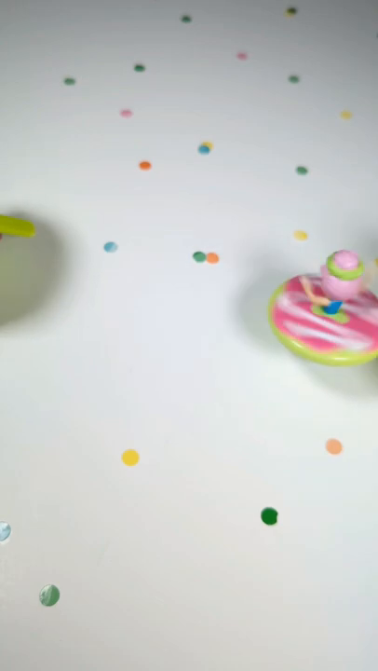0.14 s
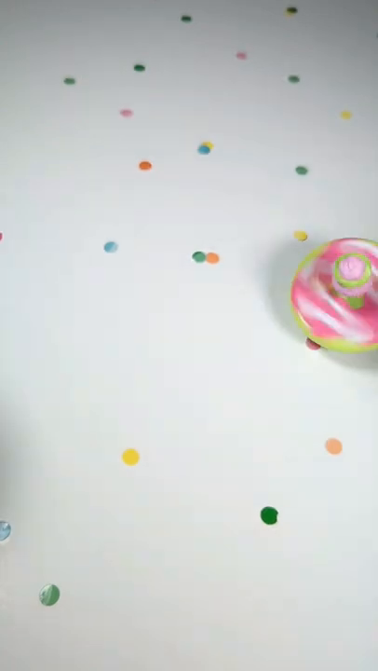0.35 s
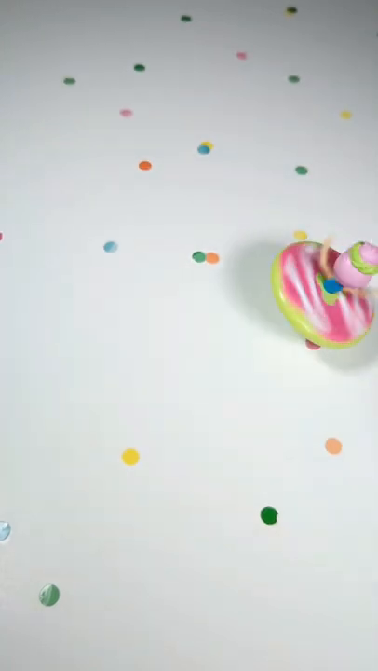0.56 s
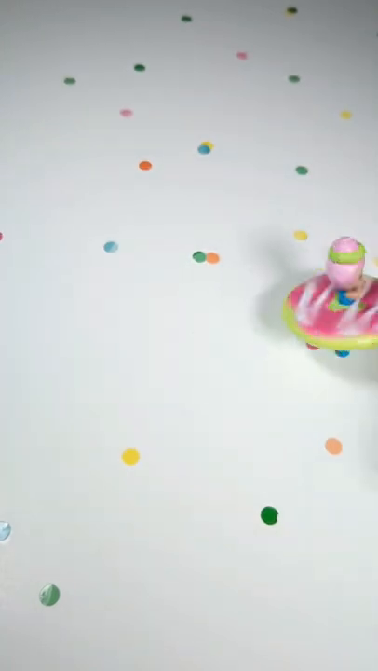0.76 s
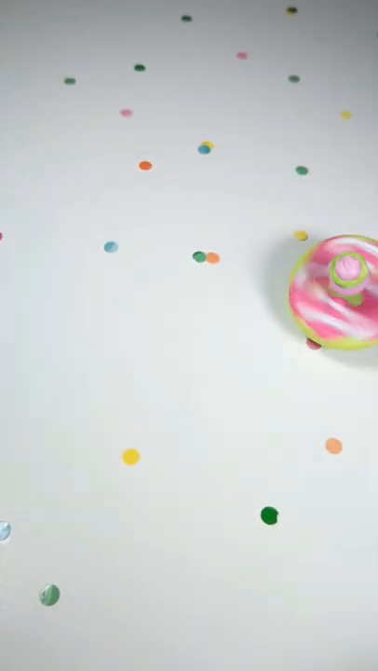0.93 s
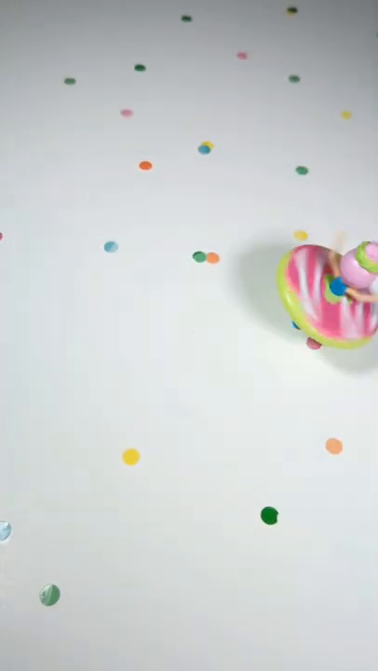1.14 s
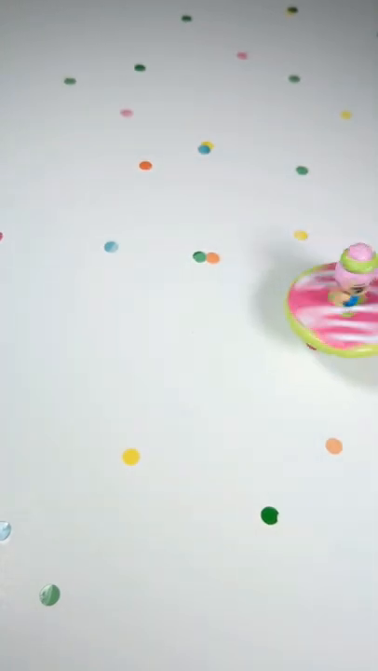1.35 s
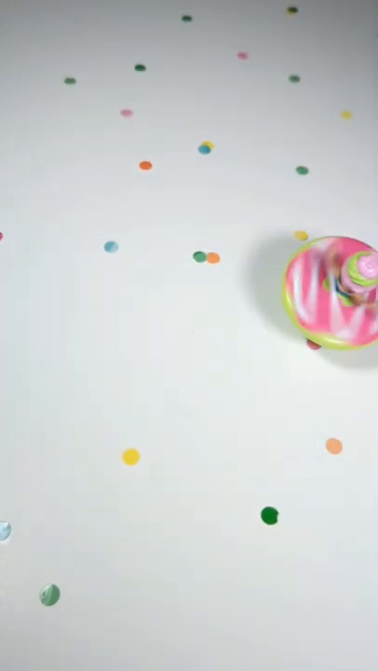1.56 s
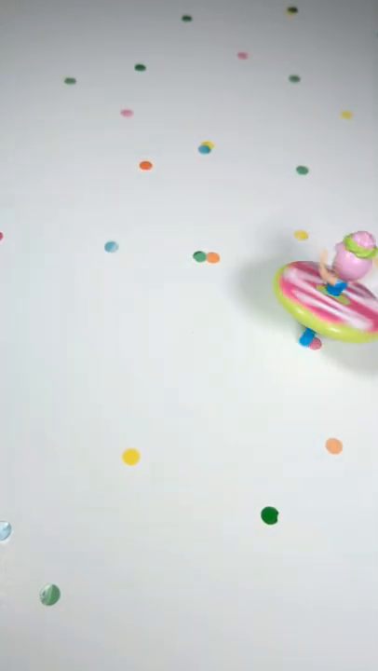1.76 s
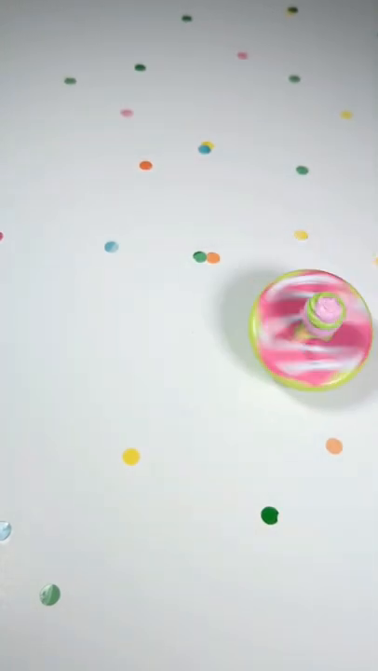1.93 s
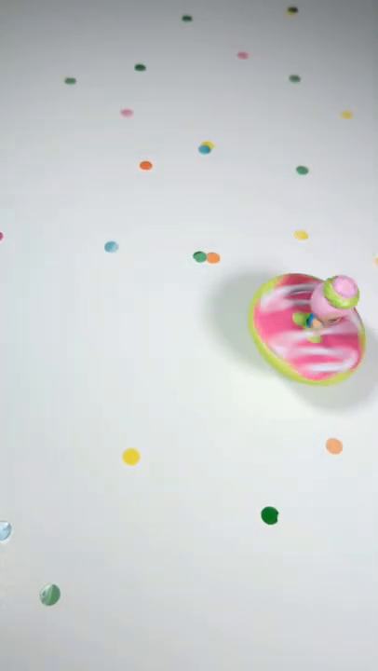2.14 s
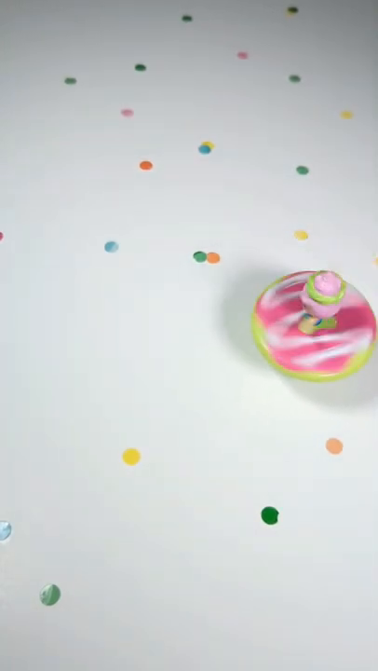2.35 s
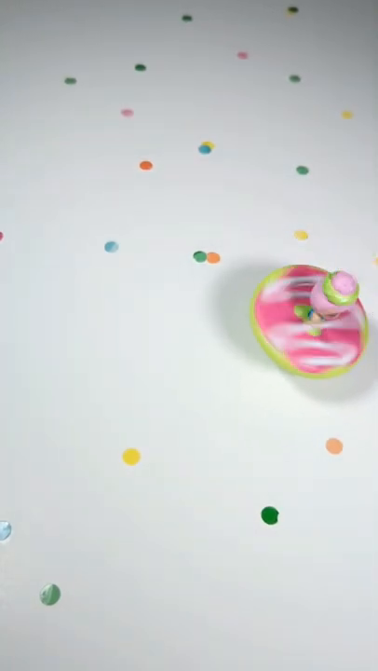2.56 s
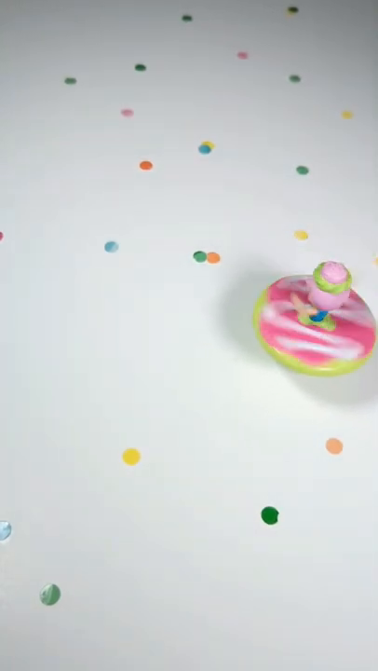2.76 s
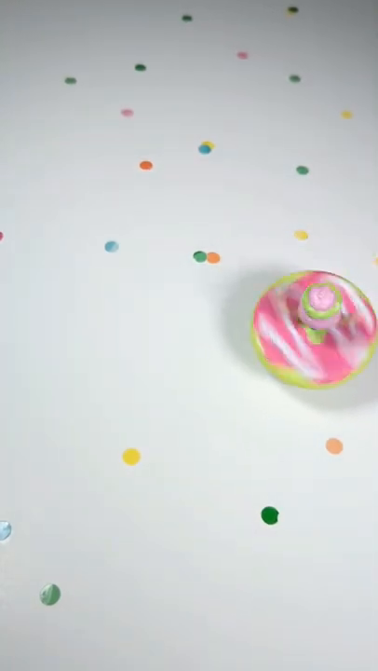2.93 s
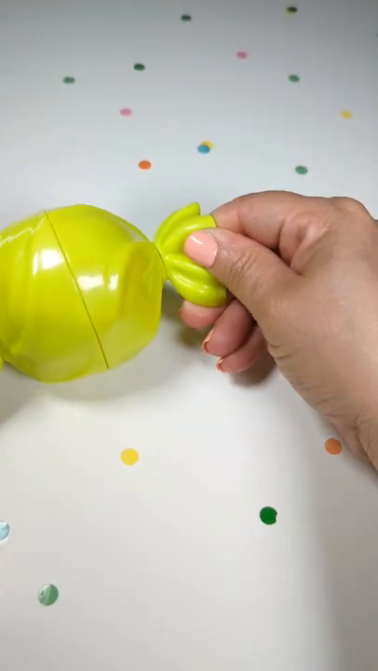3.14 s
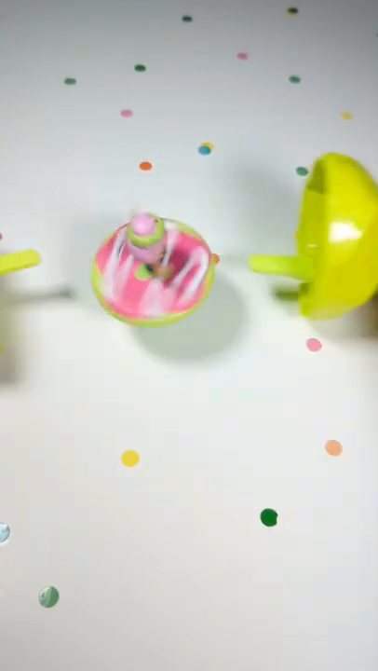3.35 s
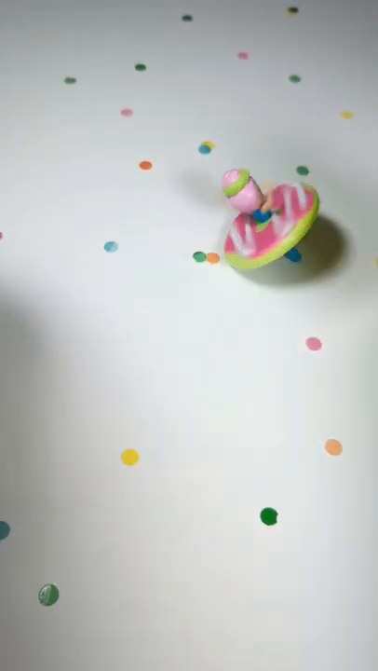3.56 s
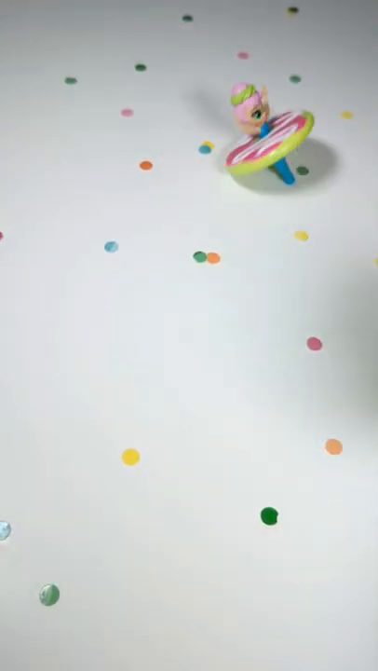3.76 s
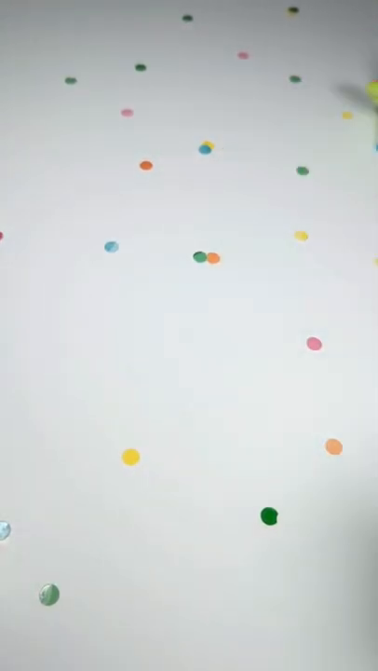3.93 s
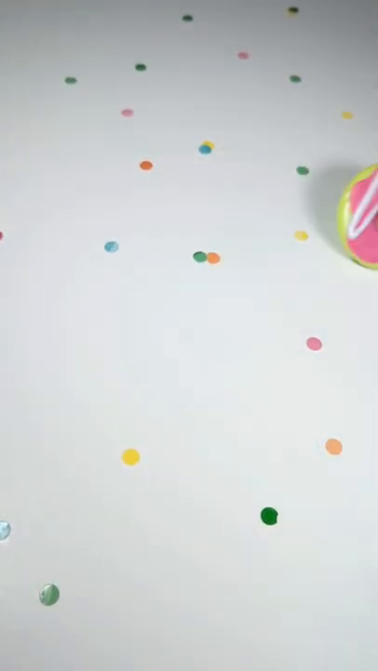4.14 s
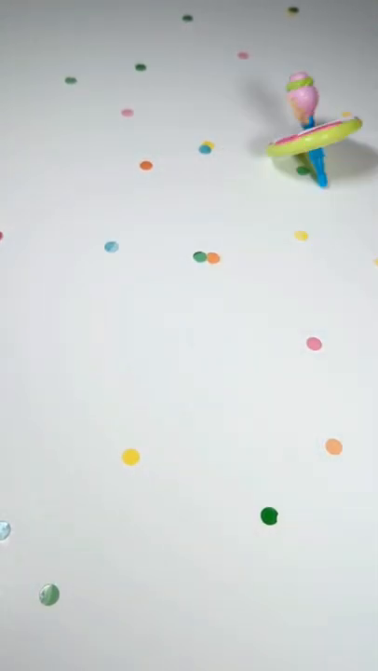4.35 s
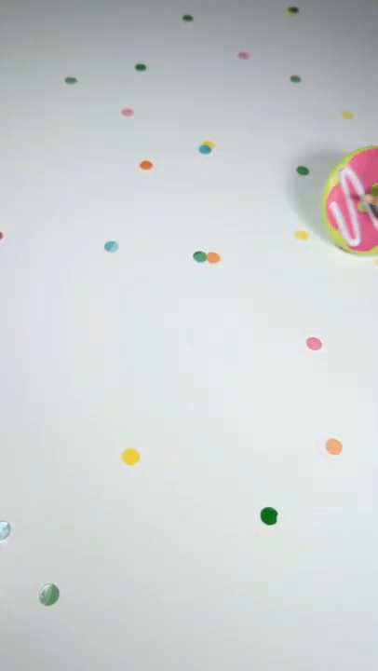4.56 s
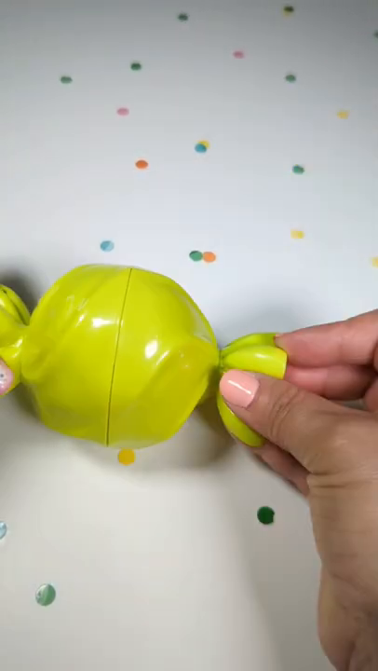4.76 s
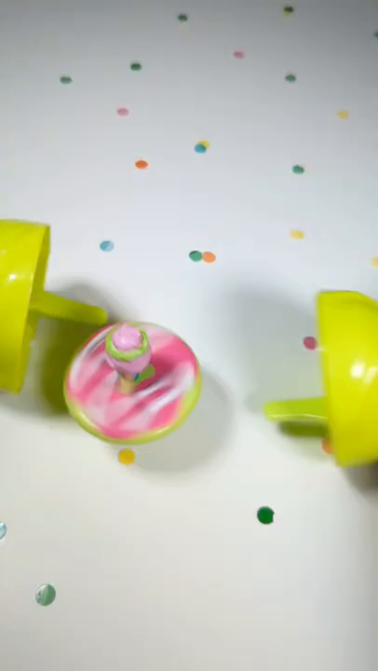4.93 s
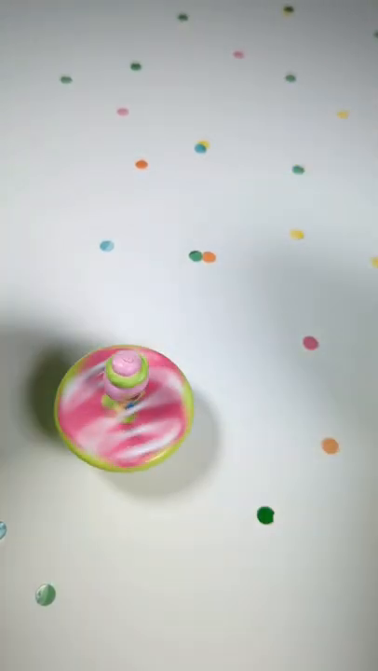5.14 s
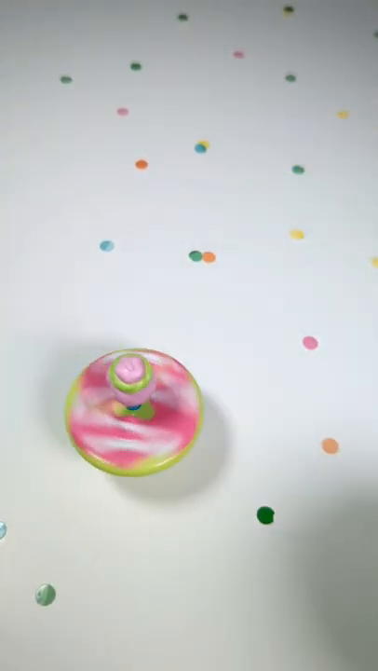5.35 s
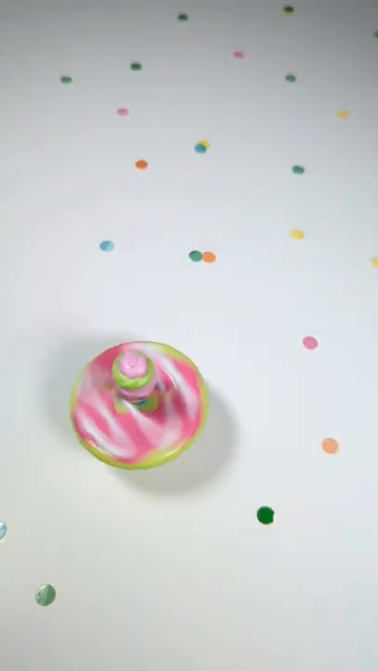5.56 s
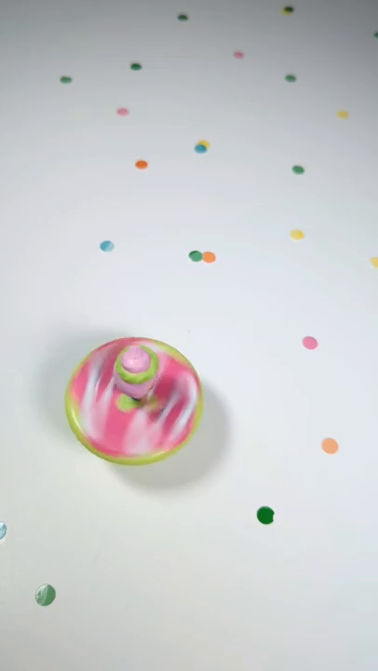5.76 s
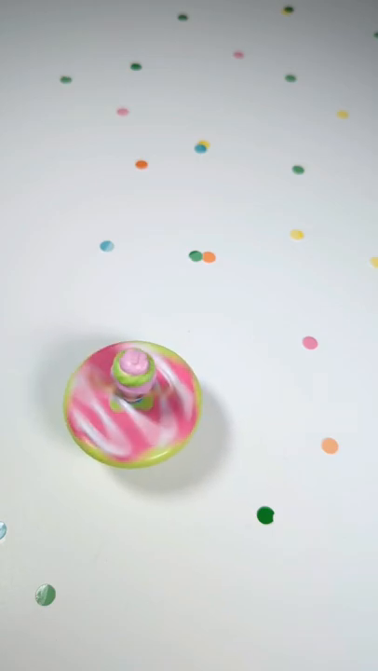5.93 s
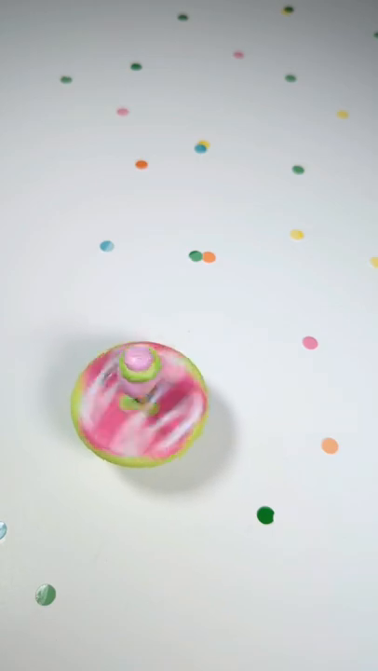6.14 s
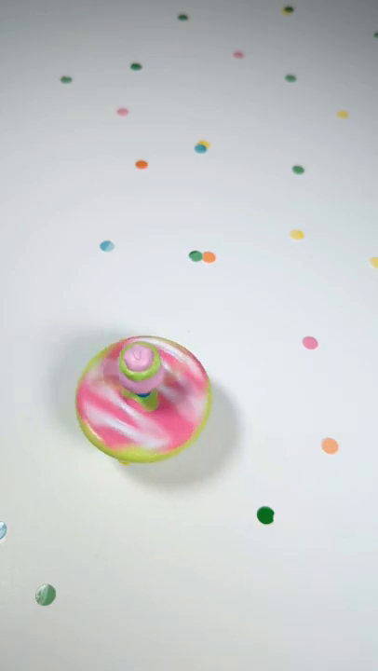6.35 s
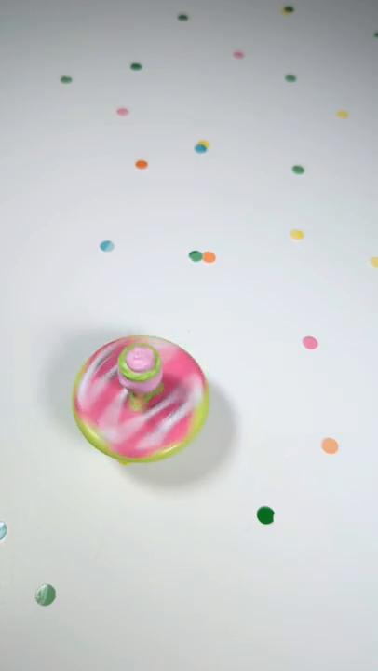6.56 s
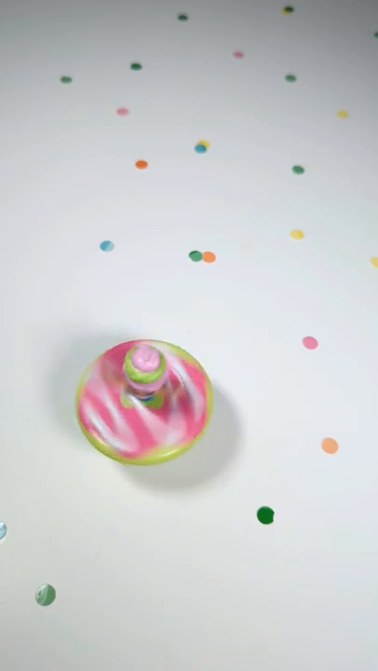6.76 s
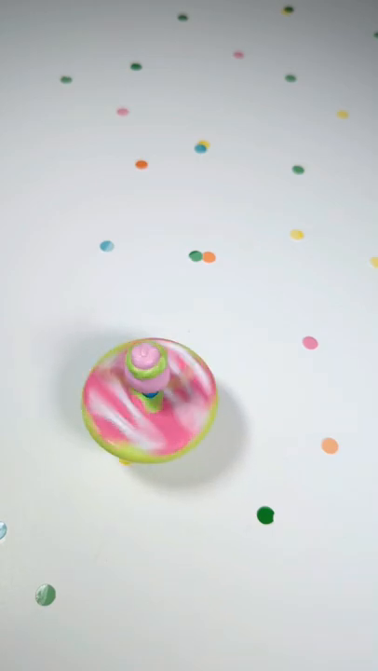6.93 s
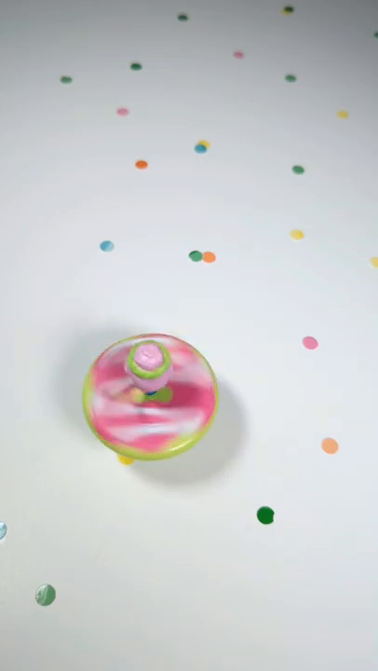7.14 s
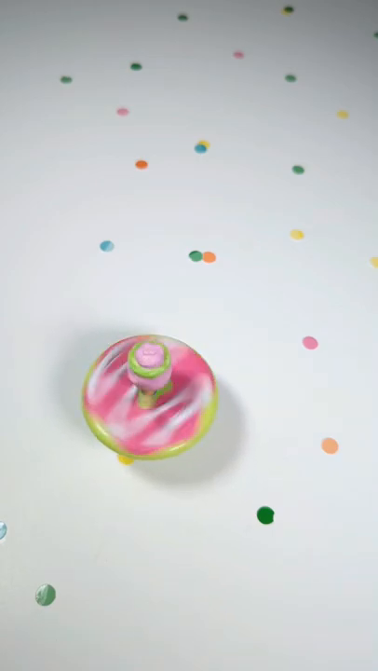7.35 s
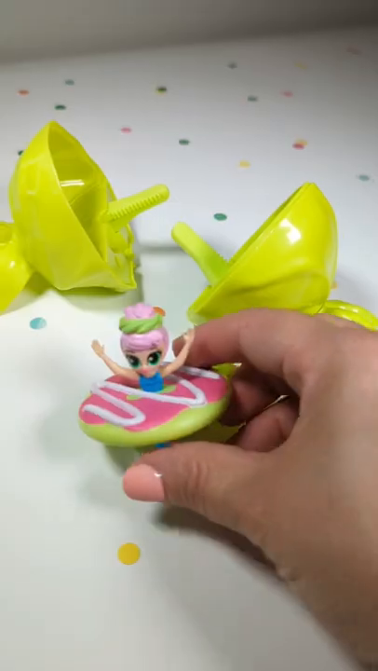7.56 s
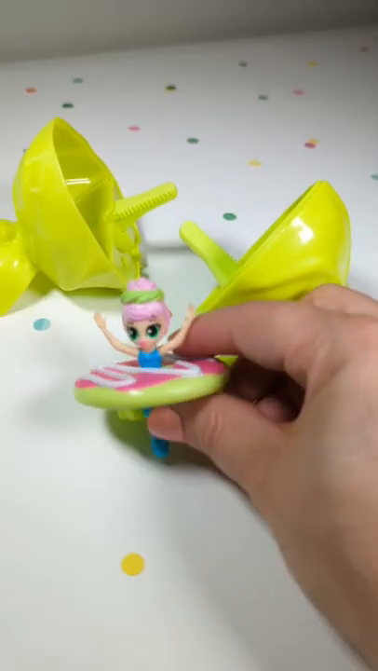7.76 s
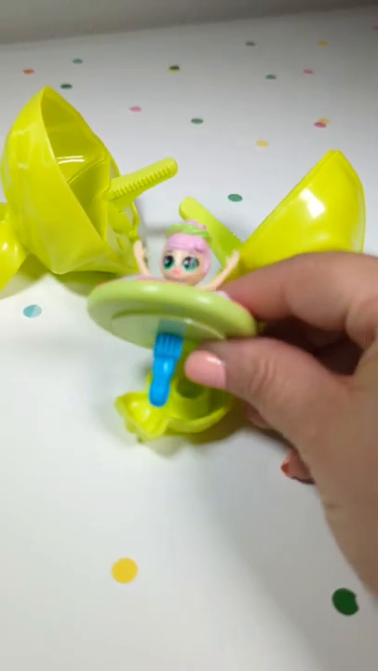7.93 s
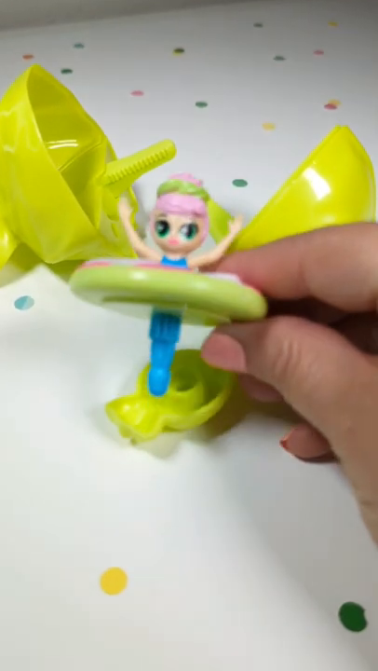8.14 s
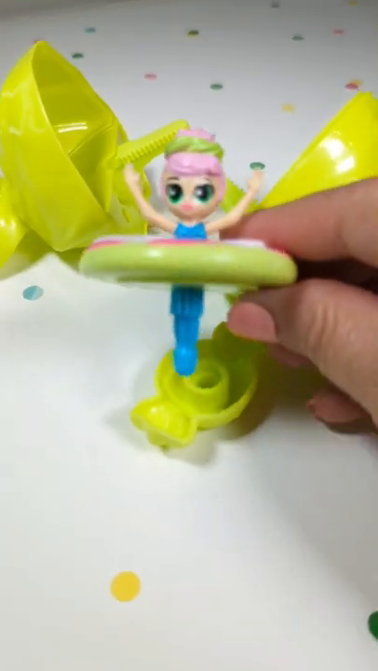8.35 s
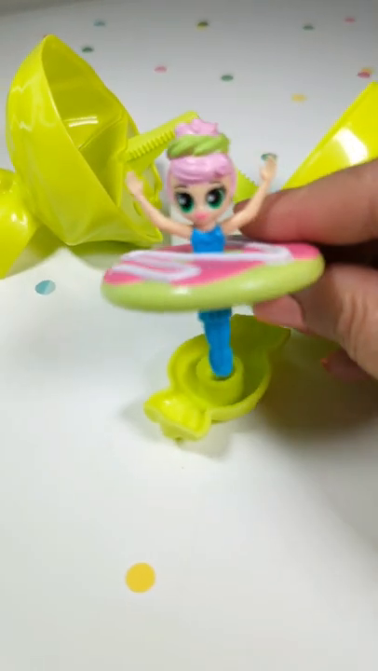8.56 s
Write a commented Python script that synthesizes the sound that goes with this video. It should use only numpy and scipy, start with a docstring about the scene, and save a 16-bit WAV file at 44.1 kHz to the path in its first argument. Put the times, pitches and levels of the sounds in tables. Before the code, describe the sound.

Close perspective on a hard, resonant table in a small room with faint low air noise. At 0.13 s a very short rising gear rasp ends in bright plastic snaps; the top lands at 0.2 s with a rapid run of knocks and rattle until about 0.36. A low, wavering hum near 250 Hz with faint scratching continues, swelling gently around 1.4 and 2 s, fading by 3 s. A quiet gap with slight rubbing follows. At 3.42 s a second zip and snap bring loud, irregular thuds to 3.9, then deep skittering rumble, tiny ticks, a brief faint squeak at 4.05 and bumps at 4.35 and 4.82. It cuts off at 4.89. At 5.06 s the third rasp and snaps lead to the hardest slam at 5.13, dying after 5.3 into near silence. From 7.68 to 8.55 come soft handling knocks, the clearest at 8.05, and small plastic clicks, then a faint rub.

```python
"""A plastic spinning top is launched three times, bounces on a hard table and rumbles over it on its tip.
Each launch from the hollow shell is gear teeth: random tiny impacts that ring the shell and shake the table.
Bounces and rumble are blows that ring the table's modes; sliding, ticks and squeaks come from plastic parts.
At the end a hand knocks the toy about and puts its parts down. A small room adds echoes and faint air noise."""
import sys
import numpy as np
from scipy import signal
from scipy.io import wavfile
from scipy.ndimage import uniform_filter1d

SR = 44100
rng = np.random.default_rng(int(sys.argv[2]) if len(sys.argv) > 2 else 0)


def log_audio(samples):
    """Write samples as a 16-bit WAV file to the path given in sys.argv[1]."""
    # one column per channel
    frames = np.atleast_2d(samples).T
    # limit to full scale, then quantise
    limited = np.clip(frames, -1, 1)
    pcm = np.round(limited * 32767).astype(np.int16)
    wavfile.write(sys.argv[1], SR, pcm)


N = 383669

# The launcher's shell snaps and clacks. Each row: time in seconds, level in dB.
SNAP_EVENTS = [(0.1484, -15), (0.168, -19.5), (0.206, -5.5), (0.207, -8.5), (1.2302, -28.5), (1.2352, -38),
               (1.486, -35.5), (3.497, -6.5), (5.078, -18.5), (5.089, -12), (5.1267, -9.5), (5.128, -13),
               (8.055, -28)]
# The gear speeds up, lets the top go and whirrs on, if its stop comes after the release.
# Each row: start, full speed, release and stop in seconds, rasp, shell drone, table shake and whirr in dB,
# whine at the release in Hz, whine in dB.
LAUNCH_EVENTS = [(0.128, 0.184, 0.19, 0.45, -25.5, -24, -15.5, -61.5, 2040, -23.5),
                 (3.419, 3.466, 3.478, 4.3, -28, -26.5, -18.5, -59, 1750, -29),
                 (5.056, 5.087, 5.094, 4.1, -20.5, -32, -31, -67, 1488, -28.5)]
# Plastic parts slide over each other. Each row: middle in seconds, length in seconds,
# hiss, shell scrape and table rumble in dB.
SLIDE_EVENTS = [(1.363, 0.077, -72, -56, -62), (1.451, 0.082, -54, -52.5, -48),
                (1.591, 0.15, -63, -69, -52), (3.131, 0.078, -70.5, -66, -69),
                (3.188, 0.058, -54.5, -82, -62), (3.243, 0.066, -64, -81.5, -67),
                (8.65, 0.2, -67.5, -75.5, -57)]
# Ways the table rings. Each row: pitch in Hz, level in dB, seconds to fade by 60 dB before extra damping.
TABLE_MODES = [(120, -24, .3), (171, -7, .26), (193, -15, .2), (251, 4, .22), (320, -4, .14),
               (350, -6, .12), (463, 1, .16), (497, -5, .13), (556, -10, .11), (619, 5, .14),
               (660, -6, .11), (739, -6, .15), (790, -9, .12), (852, -9, .15), (897, -10, .12),
               (982, -6, .12), (1080, -9, .11), (1190, -12, .1), (1330, -10, .12)]
# Colour of a thud on the table. Each row: frequency in Hz, level in dB.
THUD_COLOUR = [(30, -38), (70, -15.5), (160, -6.5), (400, 5), (950, -3.5), (1400, -11.5), (2400, -18),
               (3600, -34), (6000, -48), (15000, -60.5)]
# Colour of hard plastic contact. Each row: frequency in Hz, level in dB.
PLASTIC_COLOUR = [(200, -18), (1200, 1.5), (2400, 3.5), (3500, 0), (4500, -0.5), (6800, -0.5), (8000, -4.5),
                  (9500, -0.5), (12000, -1), (15500, -5.5)]
# Clear ringing of the hollow shell. Each row: pitch in Hz, level in dB, seconds to fade by 60 dB.
SHELL_MODES = [(1400, -5.5, 0.046), (1756, 1, .08), (1910, -1.5, 0.077), (2043, -4.5, 0.056),
               (2330, -7.5, .06), (4190, -4.5, 0.04), (6360, -10, 0.045)]
# Colour of dry friction on the table. Each row: frequency in Hz, level in dB.
SCRATCH_COLOUR = [(100, 8), (600, 5.5), (1300, 0), (2100, 3.5), (2900, -1), (4000, -8), (6800, -16),
                  (8200, -31), (15000, -16)]
# Colour of plastic sliding on plastic. Each row: frequency in Hz, level in dB.
SLIDE_COLOUR = [(500, -23.5), (2000, 0), (4000, -0.5), (6500, 0.5), (8200, -3.5), (10000, 2.5),
                (12500, -1.5), (15500, -7.5)]
# Colour of the air noise. Each row: frequency in Hz, level in dB.
AIR_COLOUR = [(15, -34.5), (25, -5), (48, -1.5), (69, -19.5), (118, -2.5), (181, -14.5), (213, -23),
              (250, -6.5), (363, -27.5), (655, -23), (903, -28), (5570, -35.5), (15000, -38.5)]
# How the room echoes die. Each row: frequency in Hz, seconds to fade by 60 dB.
ROOM_FADE = [(100, .26), (300, .17), (800, .17), (2000, .26), (5000, .25), (14000, .25)]
# Moments when the sound of the table blows breaks off. Each entry: time in seconds.
BREAK_TIMES = [3.077, 4.886]
# The tip sticks and squeals. Each row: start in seconds, length in seconds, middle pitch in Hz, level in dB.
SQUEAK_EVENTS = [(4.05, 0.043, 2190, -47.5), (4.595, 0.074, 5600, -70)]
# Ringing of the toy's plastic parts. Each row: pitch in Hz, level in dB, seconds to fade by 60 dB.
TOY_MODES = [(1430, -3, 0.092), (1810, -8, 0.041), (2400, -0.5, .07), (2530, 0, 0.086)]
# Push of an upright spinning tip on the table. Each row: frequency in Hz, level in dB.
UPRIGHT_FORCE = [(25, -9), (80, 3.5), (130, 3), (185, 11), (218, 2), (250, 0.5), (295, -6.5), (470, -17.5),
                 (630, -22.5), (1000, -26.5), (3000, -47.5)]
# Push of a tilted, skittering tip on the table. Each row: frequency in Hz, level in dB.
TILTED_FORCE = [(25, 29), (80, -11), (145, 13.5), (200, 9.5), (260, -4.5), (380, -1.5), (500, -17),
                (700, -17), (3000, -34.5)]
# The top bounces. Each row: time in seconds, level in dB, hardness in dB, plastic tick in dB against the level.
BOUNCE_EVENTS = [(0.203, -6.5, -2, -4), (0.247, -9.5, -1, -21), (0.2615, -8.5, -7.5, -30),
                 (0.294, -8.5, -10.5, -23), (0.314, -13, -10, -33), (0.333, -13.5, -18, -31),
                 (0.352, -12, -22.5, -41), (1.925, -34.5, -32, -31), (3.068, -31, -15.5, -20),
                 (3.475, -12, 2.5, -3), (3.4995, -6.5, 10, -8), (3.558, -7.5, -1, -35),
                 (3.5755, -9.5, 4, -35), (3.6065, -5, -4, -22.5), (3.63, -13.5, -13, -28),
                 (3.728, -13, -0.5, -20.5), (3.7815, -22, -5, -27), (3.8035, -18.5, -6, -23),
                 (3.8585, -13, -3.5, -24), (4.3465, -10, -6.5, -26.5), (4.695, -26.5, -8, -43),
                 (4.8175, -15.5, -10, -16.5), (4.834, -14.5, -16.5, -24.5), (5.126, -1.5, 13.5, -33),
                 (5.154, -7, -1.5, -22), (5.1735, -11.5, -4, -35), (5.217, -5.5, -2.5, -19),
                 (5.263, -12.5, -8.5, -26)]
# A hand puts the toy's parts down. Each row: time in seconds, level in dB, hardness in dB,
# plastic tick in dB against the level.
KNOCK_EVENTS = [(7.678, -25.5, -5, -43), (7.831, -39, -4, -30), (7.8415, -33, -10.5, -30),
                (7.989, -28, -8.5, -31), (8.0545, -18, -4, -4), (8.352, -52, -12, -24.5)]
# Light ticks of the top's own parts. Each row: time in seconds, level in dB, share of ringing in dB.
TICK_EVENTS = [(4.04, -45, -11), (4.106, -44.5, 3), (4.166, -55.5, -10), (5.404, -45.5, 5.5),
               (8.281, -48, -12), (8.345, -39.5, -3), (8.5415, -38, -10.5)]
# Each spin runs hard at first, then calms down. Each row: start, start of calming, end of calming and end
# in seconds, rumble in dB, scratch in dB, dB lost in calming, tilt from 0 to 1.
SPIN_EVENTS = [(0.3, 1.295, 2.7, 3.08, -49, -67, 16, 0), (3.56, 3.7, 3.8, 4.886, -25.5, -56.5, 15, 0.83),
               (5.302, 5.749, 6.2, 7.62, -71, -70, 14.5, 0.15)]
# The top leans over and its tip bears on the table. Each row: middle in seconds, length in seconds, level in dB.
SWERVE_EVENTS = [(0.872, 0.15, -42.5), (1.402, 0.12, -35.5), (1.653, 0.23, -54.5), (1.944, 0.092, -34.5),
                 (2.022, 0.19, -35.5), (2.429, .18, -52), (2.785, 0.061, -60), (3.064, .06, -34.5),
                 (3.89, 0.36, -30), (4.047, 0.033, -33), (4.164, 0.12, -35), (4.359, 0.12, -29.5),
                 (4.687, 0.2, -37)]
# The top chatters between its first bounces. Each row: start and end in seconds, table and plastic in dB.
LANDING_EVENTS = [(0.205, 0.357, -26.5, -39), (3.51, 3.94, -28, -34.5), (5.128, 5.295, -21.5, -31.5)]
# Stretches of steady low rumble and faint scratchy noise. Each row: start and end in seconds,
# rumble and scratch in dB.
BACKGROUND_STRETCHES = [(3.128, 3.28, -60, -73), (4.902, 5.05, -70, -76.5), (7.636, 8.702, -64, -64)]
# Many short shell modes blur into one band. Each row: frequency in Hz, level in dB.
HOLLOW_COLOUR = [(300, -22.5), (900, -5.5), (1400, -0.5), (2000, 1), (2700, -1.5), (3300, -16),
                 (4200, -18.5), (8000, -36)]

TIME = np.arange(N) / SR  # seconds
RING = TIME[:SR // 3]  # seconds since a blow
COAST_S, WHIRR_FADE_DB_PER_S, WHINE_RISE_HZ_PER_S = .03, 26.5, 6000
CHATTER_FADE_DB_PER_S, RATTLE_FADE_DB_PER_S = 44.5, 76.5
SCRATCH_FOLLOWS = 0.68  # share of a spin's calming that the scratch follows
EDGE_HZ = 15650  # top of the final band


def amp(db):
    """Turns decibels into gain."""
    return 10 ** (np.asarray(db) / 20)


def evened(x):
    """Scales a sound to an average (rms) level of 1."""
    return x / np.sqrt(np.mean(x ** 2) + 1e-20)


def unit(x):
    """Scales a sound to energy 1."""
    return x / np.linalg.norm(x)


def steadied(x, size):
    """Evens out swells slower than a window of size samples."""
    return x / np.sqrt(abs(uniform_filter1d(x ** 2, size)) + 1e-12)


def read(points, hz):
    """Reads between the points of a table on a log-frequency axis."""
    f, value = np.transpose(points)
    return np.interp(np.log(hz + 1), np.log(f), value)


def add(mix, s, sound):
    """Mixes a sound in at time s."""
    part = mix[round(s * SR):][:len(sound)]
    part += sound[:len(part)]


def gate(start, end, edge_s=0.025):
    """1 between two times, with short ramps."""
    return np.clip(np.minimum(TIME - start, end - TIME) / edge_s + .5, 0, 1)


def swell(s, length):
    """A smooth rise and fall that peaks at time s."""
    return np.cos(np.pi * np.clip((TIME - s) / length, -.5, .5)) ** 2


def smooth_noise(count, size):
    """Slow random wandering with an average (rms) size of 1."""
    return evened(uniform_filter1d(rng.standard_normal(count), size))


def tone(pitch):
    """A sine wave that follows a changing pitch in Hz."""
    return np.sin(2 * np.pi * np.cumsum(pitch) / SR)


def convolve(x, response):
    """Lets every sample of x set off the response, and keeps the length."""
    return signal.oaconvolve(x, response)[:len(x)]


def colour(x, points, size=4096):
    """Filters x to the given spectrum, with nothing sounding before its cause."""
    log_gain = np.log(amp(read(points, abs(np.fft.fftfreq(size, 1 / SR)))))
    minimum_phase = np.exp(np.conj(signal.hilbert(log_gain)))
    return convolve(x, np.fft.ifft(minimum_phase).real[:size // 2])


def grains(per_s, spread_db):
    """Random tiny impacts of uneven size, as rough surfaces give."""
    sign, size, chance = rng.standard_normal(N), rng.exponential(1, N), rng.random(N)
    out, hit = np.zeros(N), chance < per_s / SR
    out[hit] = sign[hit] * amp(spread_db * np.minimum(size[hit], 4))
    return out


def ringing(modes, weights_db):
    """Adds up decaying modes; neighbours start in opposite directions."""
    out = np.zeros(len(RING))
    for k, (hz, db, t60) in enumerate(modes):
        decay = amp(db + weights_db[k] - 60 * RING / t60)
        out += (-1) ** k * decay * np.cos(2 * np.pi * hz * RING)
    return out


def early(x, echo_db=-5, count=7):
    """First reflections from the table top and the things on it, up to 8 ms late."""
    taps = np.zeros(SR // 125)
    taps[rng.integers(20, len(taps), count)] = rng.uniform(-1, 1, count)
    echoed = x + amp(echo_db) * convolve(x, unit(taps))
    return echoed / np.hypot(1, amp(echo_db))


def tail(t60s):
    """Dense room echoes: noise in which each band dies at its own speed."""
    hz, t, z = signal.stft(rng.standard_normal(len(RING)), SR, nperseg=256)
    fade = amp(-60 * t / read(t60s, hz)[:, None])
    return unit(signal.istft(z * fade, SR)[1][:len(RING)])


def table(spot_db=2, modes_db=2.5, dense_db=-1, dense_t60=.08):
    """One blow: the direct thud, low modes weighted by the spot that is struck, and dense short modes."""
    modes = ringing(TABLE_MODES, spot_db * rng.standard_normal(len(TABLE_MODES)))
    band = signal.butter(3, [90, 1400], "band", fs=SR, output="sos")
    modes = signal.sosfilt(band, modes)
    dense = colour(rng.standard_normal(len(RING)) * amp(-60 * RING / dense_t60), THUD_COLOUR)
    spread = np.minimum(RING / .005, 1)  # bending waves need a few milliseconds to fill the plate
    thud = unit(colour(1. * (RING == 0), THUD_COLOUR))
    return thud + amp(modes_db) * unit(spread * modes) + amp(dense_db) * unit(spread * dense)


def click(modes, ring_db, t60, modes_db, spot_db=0.5):
    """A crack, a brief dense ring and a few modes of the plastic part, with peak 1."""
    ring = unit(rng.standard_normal(len(RING)) * amp(-60 * RING / t60))
    crack = unit(colour((RING == 0) + amp(ring_db) * ring, PLASTIC_COLOUR))
    part = unit(ringing(modes, spot_db * rng.standard_normal(len(modes))))
    sound = crack + amp(modes_db) * part
    return sound / abs(sound).max()


def air_noise():
    """Faint steady air noise: random noise, mostly of low pitch."""
    return amp(-68) * evened(colour(rng.standard_normal(N), AIR_COLOUR))


def shell(force, weights_db, dense_db):
    """The hollow shell sounds under a rough contact: a few clear modes over many blurred ones."""
    clear = evened(convolve(force, ringing(SHELL_MODES, weights_db)))
    blurred = evened(early(colour(force, HOLLOW_COLOUR), echo_db=-7))
    return steadied(clear + amp(dense_db) * blurred, size=900)


def whine(hz, s, jitter=.2, size=20):
    """The rough tone of the gear teeth; it climbs as the gear speeds up and passes about hz at time s."""
    climb = hz + WHINE_RISE_HZ_PER_S * (TIME - s)
    return np.sqrt(2) * tone(climb * (1 + jitter * smooth_noise(N, size)))


def launcher():
    """Gear teeth race past each other, sounding the shell and shaking the table; the freed gear whirrs on."""
    teeth = grains(per_s=2200, spread_db=2.0)
    rasp = steadied(early(colour(teeth, PLASTIC_COLOUR), echo_db=-0.5), size=900)
    drone = shell(teeth, np.array([-1, -3, -0.5, 1, -0.5, -11.5, -12]), dense_db=2.5)
    shake = steadied(convolve(teeth, table(spot_db=2.3, dense_db=0.5)), size=900)
    whirr = evened(early(colour(grains(per_s=2200, spread_db=2.5), SLIDE_COLOUR), echo_db=-2))
    out = np.zeros(N)
    for start, full, release, stop, rasp_db, drone_db, shake_db, whirr_db, whine_hz, whine_db in LAUNCH_EVENTS:
        speed = np.interp(TIME, [start, full, release, release + COAST_S], [0, 1, 1, 0])
        out += speed ** 2 * (amp(rasp_db) * rasp + amp(drone_db) * drone + amp(shake_db) * shake)
        whining = gate(full - COAST_S, release + COAST_S) * amp(whine_db)
        out += speed * whining * whine(whine_hz, release)
        fading_db = whirr_db - WHIRR_FADE_DB_PER_S * np.maximum(TIME - release, 0)
        out += whirr * gate(release, stop) * amp(fading_db)
    return out


def snaps():
    """Sharp plastic snaps and clacks: each one cracks and rings the shell."""
    out = np.zeros(N)
    for s, db in SNAP_EVENTS:
        add(out, s, amp(db) * click(SHELL_MODES, ring_db=7.5, t60=0.025, modes_db=-8))
    return out


def blows(rows, low_db, body_db, mid_db, damping_db_per_s, body_follows=.35, mid_follows=0.94):
    """Plastic strikes the table; harder contact drives more high modes, and damping shortens them all."""
    out = np.zeros(N)
    for s, db, hard_db, tick_db in rows:
        knock = table(spot_db=1.7, modes_db=2.5, dense_db=-3.5, dense_t60=.08)
        knock = knock * amp(-damping_db_per_s * RING)
        body, mid = body_db + body_follows * hard_db, mid_db + mid_follows * hard_db
        knock = colour(knock, [(150, low_db), (280, 0), (560, body), (900, mid), (1900, hard_db)])
        add(out, s - .0005, -amp(db) * knock / abs(knock).max())
        add(out, s, amp(db + tick_db) * click(TOY_MODES, ring_db=7, t60=0.027, modes_db=-11.5))
    return out


def chatter(stop_s=0.056):
    """Many small hops of the landing top rattle the table and the top itself, and die away."""
    hops = grains(per_s=400, spread_db=3.0)
    pushes = colour(hops, [(250, -2.5), (560, 5), (900, 0.5), (1900, -4)])
    boom = steadied(convolve(pushes, table(spot_db=1.8)), size=2000)
    rattle = shell(hops, np.array([1, -2.5, -1, 0.5, 0.5, -12.5, -17]), dense_db=6.5)
    out = np.zeros(N)
    for start, end, table_db, plastic_db in LANDING_EVENTS:
        age = np.maximum(TIME - start, 0)
        sound = amp(table_db - CHATTER_FADE_DB_PER_S * age) * boom
        sound += amp(plastic_db - RATTLE_FADE_DB_PER_S * age) * rattle
        out += sound * np.interp(TIME, [start, end, end + stop_s], [1, 1, 0], left=0)
    return out


def rumble(force):
    """Tiny bumps with the given push keep the table's low modes humming."""
    bumps = colour(grains(per_s=1000, spread_db=1.0), force)
    return steadied(convolve(bumps, table(spot_db=-2.75, modes_db=5.0, dense_db=-9.0)), size=3000)


def scratch():
    """Fine dry scratching, as of friction on the table top: dense tiny impacts."""
    return evened(colour(grains(per_s=6500, spread_db=-2.0), SCRATCH_COLOUR))


def hum(hz=251, waver_hz=8, flutter=.5, size=3000):
    """A strong low mode of the table sings as one wavering, fluttering line."""
    pitch, strength = smooth_noise(N, size), smooth_noise(N, size)
    return evened((1 + flutter * strength) * tone(hz + waver_hz * pitch))


def rolling(hum_db=-7, hum_follows=.9, swerve_scratch_db=-27):
    """The table hums under the moving top while the contact scratches; both swell when it swerves."""
    upright, tilted, grit, line = rumble(UPRIGHT_FORCE), rumble(TILTED_FORCE), scratch(), hum()
    swerve = sum(amp(db) * swell(s, length) for s, length, db in SWERVE_EVENTS)
    out = np.zeros(N)
    for start, calming, calm, end, rumble_db, scratch_db, lost_db, tilt in SPIN_EVENTS:
        drop_db = np.interp(TIME, [calming, calm], [0, lost_db])
        force = amp(rumble_db - drop_db)
        body = np.hypot(force, swerve) * ((1 - tilt) * upright + tilt * tilted)
        # the hum weakens on top of the weaker force, and a tilted top hums less
        body += (1 - tilt) * force * amp(hum_db - hum_follows * drop_db) * line
        friction = amp(scratch_db - SCRATCH_FOLLOWS * drop_db)
        contact = np.hypot(friction, amp(swerve_scratch_db) * swerve) * grit
        out += gate(start, end) * (body + contact)
    return out


def hiss():
    """Fine friction of plastic on plastic: tiny impacts with close echoes."""
    return evened(early(colour(grains(per_s=1400, spread_db=0.5), SLIDE_COLOUR), echo_db=-1.5))


def sliding():
    """Plastic rubs on plastic and rings the shell; stretches of low rumble and faint scratchy noise lie beneath."""
    rubbing = colour(grains(per_s=3000, spread_db=1.0), [(1400, -6), (4000, 12)])
    scrape = shell(rubbing, np.array([-4, -4, 0, 0, 0, -3, -8]), dense_db=6)
    rub, low, grit = hiss(), rumble(UPRIGHT_FORCE), scratch()
    out = np.zeros(N)
    for s, length, hiss_db, scrape_db, rumble_db in SLIDE_EVENTS:
        sound = amp(hiss_db) * rub + amp(scrape_db) * scrape + amp(rumble_db) * low
        out += swell(s, length) * sound
    for start, end, rumble_db, scratch_db in BACKGROUND_STRETCHES:
        out += gate(start, end) * (amp(rumble_db) * low + amp(scratch_db) * grit)
    return out


def broken_off(x, hush_s):
    """At each break the sound stops dead, then creeps back over hush_s seconds."""
    for s in BREAK_TIMES:
        creep = np.clip((TIME - s) / hush_s, 0, 1) ** 4
        x = x * np.where(TIME < s, 1, creep)
    return x


def ticks():
    """Loose plastic parts of the top tick: a short crack and a few modes each."""
    out = np.zeros(N)
    for s, db, modes_db in TICK_EVENTS:
        add(out, s, amp(db) * click(TOY_MODES, ring_db=7, t60=0.015, modes_db=modes_db))
    return out


def squeaks(wobble=0.165, size=24):
    """The tip sticks and slips, giving short unsteady tones."""
    out = np.zeros(N)
    for s, length, hz, db in SQUEAK_EVENTS:
        count = round(length * SR)
        pitch = hz * (1 + wobble * smooth_noise(len(RING), size)[:count])
        add(out, s, amp(db) * signal.windows.hann(count) * tone(pitch))
    return out


def scene(room_db=-10, plastic_room_db=-10):
    """Toy and table in a small room with faint steady air noise."""
    thuds = blows(BOUNCE_EVENTS, low_db=0.5, body_db=2, mid_db=1, damping_db_per_s=10)
    thuds += blows(KNOCK_EVENTS, low_db=1.5, body_db=4, mid_db=0.5, damping_db_per_s=20)
    thuds += chatter()
    plastic = early(snaps() + ticks() + squeaks()) + launcher()
    room = tail(ROOM_FADE)
    thuds = broken_off(thuds + amp(room_db) * convolve(thuds, room), hush_s=0.203)
    plastic = plastic + amp(plastic_room_db) * convolve(plastic, room)
    return (thuds + plastic + rolling() + sliding() + air_noise())[None]


def record(dry):
    """The loudest peaks are rounded off; then the highest treble is cut."""
    rounded = np.tanh(dry)
    low_pass = signal.firwin(511, EDGE_HZ, window=("kaiser", 9), fs=SR)
    return signal.oaconvolve(rounded, low_pass[None], "same")


dry = scene()
out = record(dry)
log_audio(out)
```